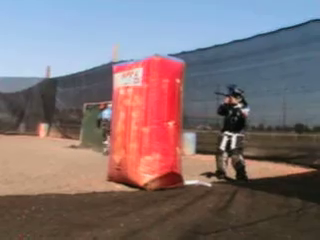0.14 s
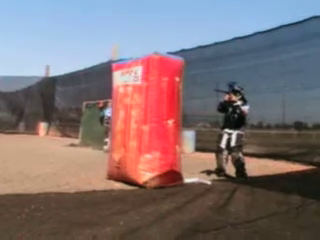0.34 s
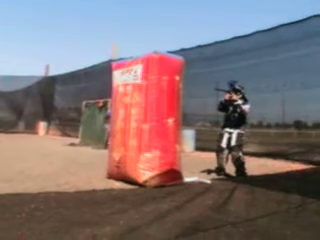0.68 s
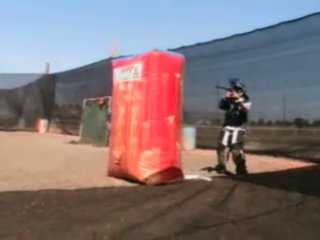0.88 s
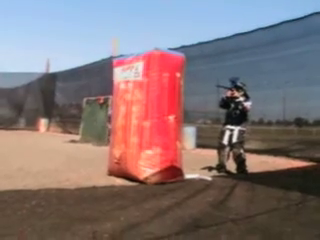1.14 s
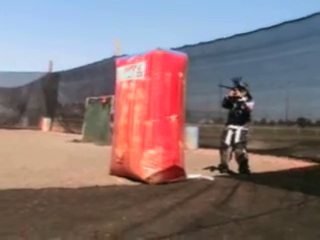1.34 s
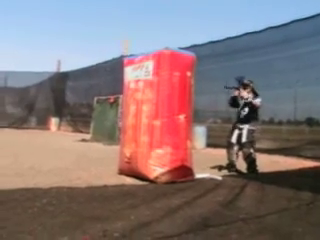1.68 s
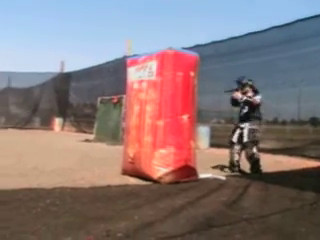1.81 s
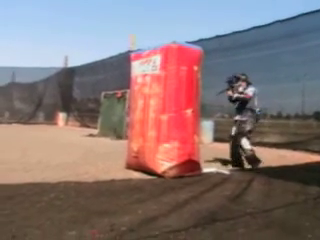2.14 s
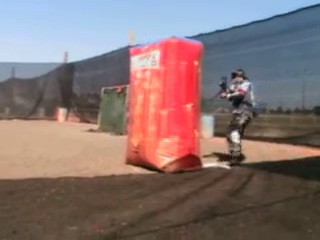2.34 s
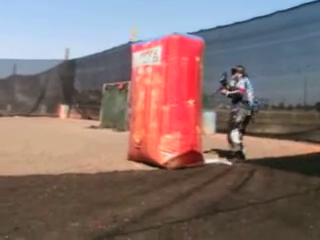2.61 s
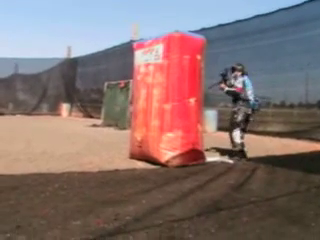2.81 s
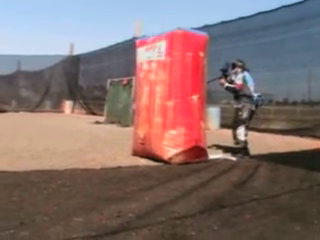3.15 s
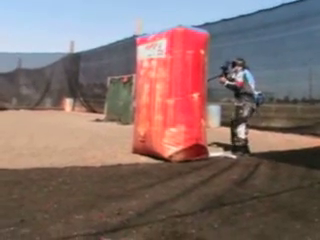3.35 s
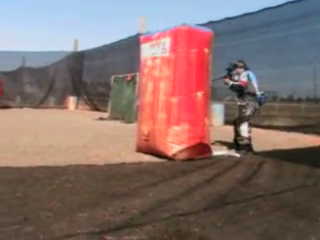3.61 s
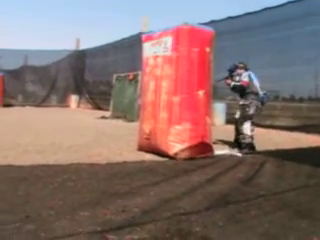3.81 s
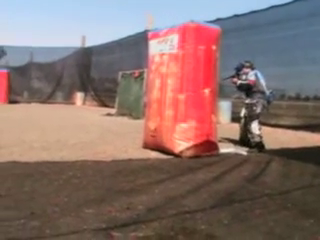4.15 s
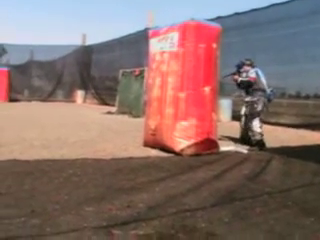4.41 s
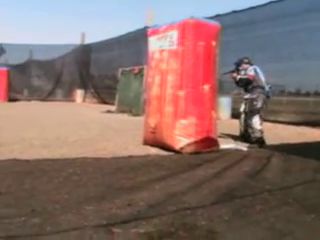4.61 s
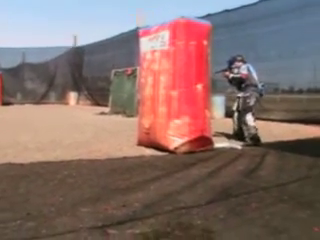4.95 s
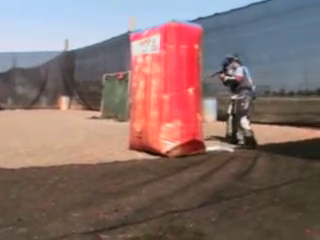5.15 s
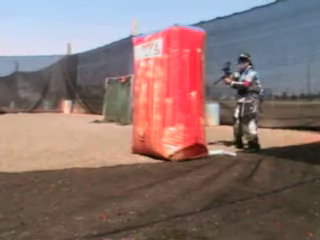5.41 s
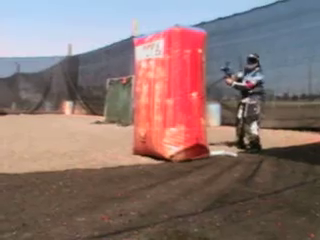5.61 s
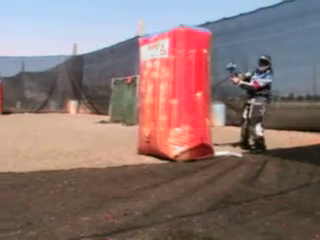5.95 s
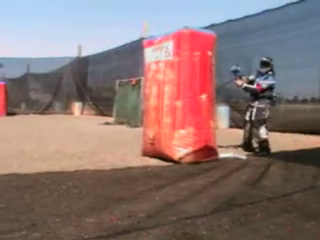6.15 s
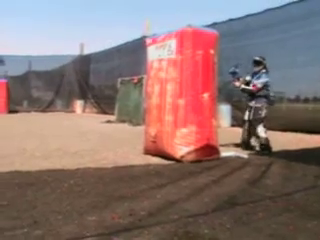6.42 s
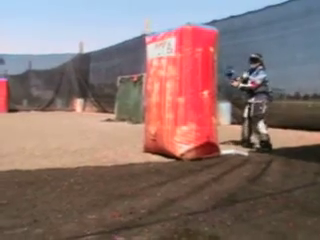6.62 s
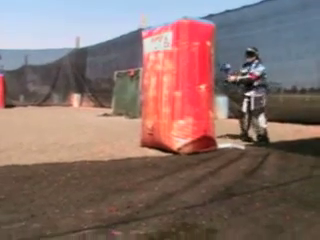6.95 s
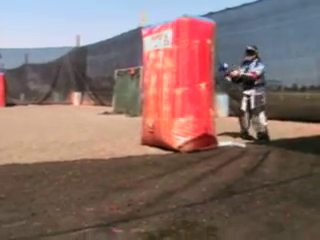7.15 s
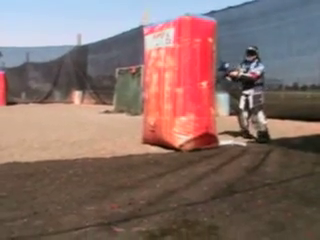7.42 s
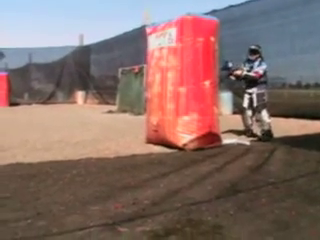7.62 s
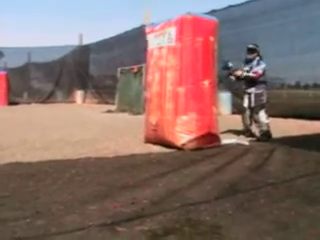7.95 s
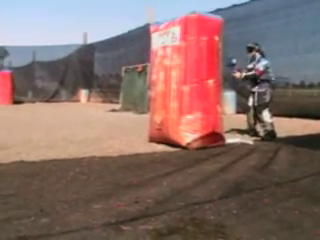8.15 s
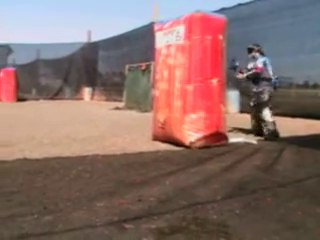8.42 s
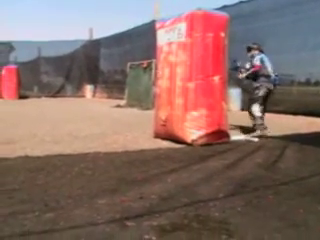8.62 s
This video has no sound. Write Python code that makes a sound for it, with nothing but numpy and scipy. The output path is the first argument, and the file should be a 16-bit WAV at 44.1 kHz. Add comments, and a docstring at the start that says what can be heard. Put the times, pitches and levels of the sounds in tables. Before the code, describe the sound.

A near paintball marker snaps off a quick string of shots, then dull hollow thumps rattle on unevenly, swelling to heavy overloaded blows outdoors.

```python
"""An open paintball field, heard beside a tall inflatable bunker. A near marker snaps off a short string of shots,
each a gas pulse through barrel resonances. Dull, hollow thumps run throughout: balls hitting the bunker nearby,
or markers firing farther off with echoes from the field. Each is a few damped modes, then a hollow ring, a short
flutter and a wash of echoes. A few light knocks come later. Behind lie filtered-noise rumble, din and hiss, with
pops of far markers. A small dull microphone overloads on the loudest blows."""
import sys
import numpy as np
from scipy import signal
from scipy.fft import rfft, irfft, next_fast_len
from scipy.io import wavfile

SR = 44100
rng = np.random.default_rng(int(sys.argv[2]) if len(sys.argv) > 2 else 0)


def output_pcm(signal):
    """Save a mono or channel-first signal as 16-bit PCM at the path in sys.argv[1].

    Samples are clipped to [-1, 1] before scaling.
    """
    pcm = np.clip(np.atleast_2d(signal).T, -1, 1) * 32767
    wavfile.write(sys.argv[1], SR, np.round(pcm).astype(np.int16))


N = 386757  # length in samples
AGE = np.arange(SR // 2) / SR  # seconds since the start of an event, up to half a second

# Game going on around the listener, gliding from row to row. Each row: start in seconds,
# then rumble, din and hiss in dB, each before the trim of its layer.
GAME_LEVELS = [(0.0, -35, -51.5, -43), (0.98, -33.5, -28.5, -44.5), (1.54, -37.5, -42, -47),
               (2.83, -40.5, -37.5, -44), (4.4, -34, -32.5, -44.5), (4.76, -41.5, -44.5, -47),
               (5.33, -36, -32, -41.5), (5.64, -40, -44, -45.5), (6.18, -28, -51, -43.5),
               (6.32, -30, -40, -34.5), (6.67, -30.5, -38.5, -37.5), (6.91, -27.5, -27, -33.5),
               (7.69, -34, -43, -41.5), (7.89, -34, -30, -39.5), (8.18, -37.5, -44, -40),
               (8.77, -26.5, -26, -38.5)]
# Tone of the open field. Each row: frequency in Hz, relative noise density in dB.
FIELD_SPECTRUM = [(30, -12), (70, 2), (200, 2.5), (330, 1.5), (500, -5.5), (1000, -12.5), (1600, -5),
                  (2600, -11.5), (4500, -24.5), (7000, -45)]
# Shots of the near marker. Each row: muzzle time in seconds, crack level in dB.
MARKER_SHOTS = [(0.0412, -11.5), (0.3972, -13.5), (0.5692, -13.5), (0.7188, -15.5), (0.868, -17.5),
                (1.0092, -13), (1.155, -15), (1.3178, -20.5), (1.4705, -16.5), (1.6605, -20.5)]
# Barrel and port resonances of the near marker. Each row: lowest frequency in Hz, width in Hz, gain in dB.
BARREL_RESONANCES = [(270, 200, 26), (590, 300, 24.5), (810, 51, 25.5), (1110, 310, 22), (1590, 100, 24),
                     (2600, 350, 4), (3240, 120, 21), (4140, 120, -40), (5200, 500, -39)]
# Tone of the echo wash. Each row: frequency in Hz, relative noise density in dB.
WASH_SPECTRUM = [(30, -19.5), (80, 6.5), (220, 12.5), (420, 3.5), (750, 9), (1250, 10.5), (1800, 3.5),
                 (2600, -10), (4200, -18.5), (7000, -42)]
# Dull, hollow thumps: balls hitting the bunker nearby, or markers firing farther off with echoes from the field.
# Each row: time in seconds, strength in dB (the level of the slap), slap pitch in Hz,
# tick level in dB over the strength, echo level in dB.
HOLLOW_THUMPS = [(0.0533, -15, 640, -24, -32.5), (.242, -9, 1044, -13.5, -22.5),
                 (0.327, -15, 623, -8.5, -31.5), (0.3875, -19.5, 756, -9, -44),
                 (0.4755, -20.5, 695, -13, -41), (0.5456, -17.5, 740, -14, -52), (0.67, -12, 980, -22, -37),
                 (0.7503, -13.5, 990, -20, -35), (0.8703, -11, 804, -10, -36), (0.9517, -22, 919, -5, -28),
                 (1.1047, -22, 1100, 0, -35.5), (1.168, -25, 970, -20, -45), (1.2718, -18, 676, -2.5, -32),
                 (1.3393, -21.5, 650, -5, -49), (1.378, -18.5, 750, -3, -35.5),
                 (1.4985, -19, 700, -1.5, -36), (1.5278, -15, 950, -17, -43), (1.615, -36, 1170, -14, -50),
                 (1.7547, -20, 980, -3.5, -32), (1.8127, -15.5, 1230, -26, -44),
                 (1.8528, -15.5, 766, -10.5, -33), (1.9403, -20, 1040, -8, -32),
                 (2.0366, -19, 710, 0, -29.5), (2.0567, -17.5, 730, -3, -51),
                 (2.178, -20, 1160, -14, -29.5), (2.324, -14.5, 1076, -25, -34.5),
                 (2.382, -15, 980, -27, -34.5), (2.4882, -18, 1100, -19, -32.5),
                 (2.5655, -23, 1420, -2, -30), (2.6403, -15, 1036, -30, -39.5),
                 (2.7007, -22, 1080, -9, -30.5), (2.8145, -18, 870, 0, -28), (2.8385, -19, 785, -5, -31.5),
                 (2.9171, -18.5, 1080, -6, -33.5), (3.107, -19.5, 990, -9.5, -28.5),
                 (3.171, -15.5, 1100, -11.5, -28.5), (3.2599, -13, 847, -13.5, -32.5),
                 (3.3426, -17, 940, -3, -32), (3.4241, -17.5, 990, -11, -32),
                 (3.4894, -20, 860, -17.5, -29.5), (3.5831, -15, 1070, -8, -32.5),
                 (3.6839, -23, 759, -7.5, -28), (3.771, -22, 675, -12, -28.5),
                 (3.8316, -17.5, 1080, -8.5, -28), (3.8923, -18, 1150, -7, -32.5),
                 (3.989, -13.5, 1040, -25, -29.5), (4.0233, -15, 1170, -14, -33),
                 (4.153, -14.5, 984, -31, -31.5), (4.2368, -18, 800, -2, -30),
                 (4.307, -18.5, 840, -4, -32.5), (4.395, -18, 750, -1.5, -29.5),
                 (4.4576, -18, 694, -4, -32), (4.5502, -14, 950, -19, -35),
                 (4.7075, -24.5, 1010, -16, -48.5), (4.8773, -9, 950, -32, -28.5),
                 (5.0554, -20.5, 746, -7.5, -26), (5.1174, -8.5, 787, -14.5, -36),
                 (5.224, -14, 1135, -8, -27.5), (5.2711, -19, 810, -15, -29.5), (5.3561, -16, 660, -5, -32),
                 (5.4381, -29, 874, -12.5, -39), (5.4863, -15.5, 860, -18, -31.5),
                 (5.7572, -30, 650, -15, -56), (5.842, -23, 740, -14, -28.5),
                 (5.928, -27, 690, -5.5, -44.5), (6.111, -29.5, 680, -7.5, -56),
                 (6.1714, -13.5, 804, -1, -25), (6.244, -29, 703, -3, -31), (6.332, -4, 735, -6.5, -23),
                 (6.685, -3, 765, -14.5, -19), (6.7711, -6.5, 764, -5.5, -23),
                 (6.8305, -11, 1096, -9.5, -22.5), (6.9579, -3.5, 880, -25, -23.5),
                 (7.021, -7, 815, -20, -25), (7.0987, -15.5, 890, -3.5, -33), (7.1792, -15.5, 870, 3, -26),
                 (7.2542, -14.5, 935, -8.5, -31), (7.3389, -10, 640, -15.5, -45),
                 (7.365, -13, 955, -6.5, -23.5), (7.401, -16.5, 814, -8, -33), (7.4511, -13, 790, -13, -41),
                 (7.499, -22.5, 690, 4, -51), (7.6648, -19, 800, 0, -29), (7.7486, -9, 1040, -6, -26.5),
                 (7.834, -17, 1216, -11, -33), (7.8647, -22, 1060, -0.5, -33), (7.9112, -25, 840, -2, -34),
                 (7.966, -14, 726, -6, -32.5), (7.996, -30, 900, 8.5, -30.5),
                 (8.0464, -11.5, 970, -14, -37), (8.0825, -27, 890, 4, -35),
                 (8.1671, -16, 1080, -12.5, -32), (8.226, -17.5, 880, -11.5, -32.5),
                 (8.235, -25.5, 930, 1, -39), (8.3231, -27, 910, -6, -35), (8.3509, -29, 1020, 4, -39),
                 (8.4048, -21.5, 950, -11, -31), (8.4405, -21.5, 1040, -8, -35),
                 (8.478, -13.5, 950, -18, -28), (8.5254, -20.5, 880, -3, -43),
                 (8.585, -19.5, 630, -2.5, -32.5), (8.6556, -23, 1020, 1, -32.5),
                 (8.697, -25, 840, -17, -48), (8.7431, -18.5, 900, -9, -36)]
# Hollow resonances that ring after a blow, varied a little from blow to blow.
# Each row: centre frequency in Hz, typical relative level in dB, time to fall 60 dB in seconds.
HOLLOW_MODES = [(182.2, 0, 0.098), (205, -9, 0.18), (251.7, 5, 0.066), (337.5, -0.5, 0.16),
                (465.5, -4.5, 0.14), (554.6, 2.5, 0.13), (677, -7.5, 0.26), (750, -4.5, 0.17),
                (806, -14, 0.27), (1022, -11.5, 0.31), (1113, -11, 0.21), (1202, -9, 0.057),
                (1240, -18.5, 0.17)]
# Tone of the short flutter after a blow. Each row: frequency in Hz, relative noise density in dB.
FLUTTER_SPECTRUM = [(30, -29), (80, -2), (210, 13), (300, -16.5), (410, -1), (600, 9), (850, -13),
                    (1300, -3), (2500, -38.5), (7000, -62.5)]
# Light knocks with a dry click, probably spent balls dropping on the mat nearby.
# Each row: time in seconds, knock level in dB.
MAT_DROPS = [(6.451, -25), (6.5497, -22), (6.606, -30), (6.6675, -21), (7.108, -24), (7.316, -21),
             (7.5182, -32), (7.584, -30.5), (7.6263, -27.5)]

# A typical blow, from which the others are reckoned.
USUAL_DB, USUAL_SLAP_HZ, USUAL_TICK_DB, USUAL_ECHO_DB = -17, 900, -12, -31
THUMP_DB, THUMP_HZ, TICK_HZ, RING_DB = -18, 265.8, 1990, -24.5
# A stronger blow thumps higher; one with a louder tick thumps less and ticks lower.
THUMP_HZ_PER_DB = 4  # per dB of strength
THUMP_LOSS, TICK_DROP_HZ = 0.089, 42  # dB and Hz, per dB of tick
# A lower slap comes with a weaker thump.
THUMP_DB_PER_OCTAVE = 3  # per octave of slap pitch
# The ring grows with the blow and with its echoes (dB per dB).
RING_PER_STRENGTH, RING_PER_ECHO = 0.37, 0.4
# No two blows sound alike (standard deviation, as a share of the pitch).
THUMP_SCATTER, TICK_SCATTER = 0.098, 0.21

MIC_HZ, TOP_HZ = 5550, 7305  # treble limits of the microphone and of the final sound
OVERLOAD, FULL_SCALE = .7, .77  # amplitudes where the microphone flattens and the input clips


def undb(db):
    """Decibels to gain."""
    return 10 ** (np.asarray(db) / 20)


def level(x, db, start=0., end=.01):
    """Scale a sound to an rms level, taken over a stretch of its life in seconds."""
    stretch = x[int(start * SR):int(end * SR)]
    return x * undb(db) / np.sqrt(np.mean(stretch ** 2))


def add(out, s, x):
    """Mix a sound in at a time in seconds, cutting it off at the end of the scene."""
    i = max(int(round(s * SR)), 0)
    out[i:i + len(x)] += x[:max(len(out) - i, 0)]


def fade(t60):
    """Exponential decay that falls 60 dB in t60 seconds."""
    return np.exp(-np.log(1000) * AGE / t60)


def swell(seconds):
    """A soft onset."""
    return 1 - np.exp(-(AGE / seconds) ** 2)


def mode(hz, t60, phase=0.):
    """A damped vibration: a sine that dies away exponentially."""
    return np.sin(2 * np.pi * hz * AGE + phase) * fade(t60)


def band(x, hz, width):
    """Two-pole resonance with gain 1 at the centre."""
    b, a = signal.iirpeak(hz, hz / width, fs=SR)
    return signal.lfilter(b, a, x)


def cut(x, hz, kind="low", order=3):
    """Low-pass or high-pass."""
    sections = signal.butter(order, hz, kind, fs=SR, output="sos")
    return signal.sosfilt(sections, x)


def noise(spectrum, size):
    """Noise of unit rms, coloured by a spectrum of (Hz, dB) points."""
    hz, db = np.transpose(spectrum)
    n = next_fast_len(size)
    f = np.maximum(np.fft.rfftfreq(n, 1 / SR), 1)
    gain = undb(np.interp(np.log(f), np.log(hz), db))
    x = irfft(rfft(rng.standard_normal(n)) * gain, n)[:size]
    return x / x.std()


def curve(table):
    """Gain per sample for each dB column of a table, gliding between its times."""
    s, *columns = np.transpose(table)
    t = np.arange(N) / SR
    return [undb(np.interp(t, s, column)) for column in columns]


def far_markers(count=3, pop_db=1, scatter_db=4):
    """Distant players each keep up their own uneven string of dull pops, noise bursts at one pitch."""
    out = np.zeros(N)
    for _ in range(count):
        hz = rng.uniform(500, 1900)
        for s in np.cumsum(rng.uniform(0.075, 0.73, size=60)):
            if s < N / SR:
                burst = rng.standard_normal(len(AGE)) * (fade(0.024) + 0.073 * fade(0.05))
                pop_level = pop_db + scatter_db * rng.uniform(-4.0, 1)
                add(out, s, level(band(burst, hz, 600), pop_level))
    return cut(out, 2500, order=2)


def field(low_db=-4, middle_db=-8, high_db=-2):
    """Far pops over a rumble, a distant din and a hiss that swell with the game."""
    low, middle, high = curve(GAME_LEVELS)
    rumble = cut(noise(FIELD_SPECTRUM, N), 650)
    din = cut(cut(noise(FIELD_SPECTRUM, N), 550, "high"), 2000)
    hiss = cut(noise(FIELD_SPECTRUM, N), 1600, "high")
    rumble_layer = undb(low_db) * low * rumble / rumble.std()
    hiss_layer = undb(high_db) * high * hiss / hiss.std()
    # the far pops rise and fall with the din
    middle_layer = undb(middle_db) * middle * (din / din.std() + far_markers())
    return rumble_layer + middle_layer + hiss_layer


def marker(dwell_s=0.0059, echo_db=-23):
    """The solenoid ticks, the valve dumps a gas pulse down the barrel, and the bolt clacks home."""
    out = np.zeros(N)
    bolt_s = .019  # from solenoid to muzzle, and again from muzzle to bolt
    solenoid_db, bolt_db = -31, -20  # relative to the crack
    for s, db in MARKER_SHOTS:
        gas = rng.standard_normal(len(AGE)) * np.exp(-(AGE / dwell_s) ** 2)
        gas[0] -= 9  # the ball uncorks the muzzle
        crack = sum(undb(gain_db) * band(gas, hz * rng.uniform(1.0, 1.04), width)
                    for hz, width, gain_db in BARREL_RESONANCES)
        echo = undb(db + echo_db) * noise(WASH_SPECTRUM, len(AGE)) * fade(0.19)
        burst = rng.standard_normal(len(AGE)) * fade(0.02)
        click = band(band(burst, 3900, 2100), 2900, 2600)
        add(out, s - bolt_s, level(click, db + solenoid_db))
        add(out, s, level(crack, db) + echo)
        add(out, s + bolt_s, level(click, db + bolt_db))
    return out


def strike(thump_db, thump_hz, slap_db, slap_hz, tick_db, tick_hz, overtone_db=-9, spatter_db=-11, bounce_db=-15):
    """A blow built of a high tick, a slap in the middle and a low thump, all quickly damped."""
    push = mode(thump_hz, 0.024, np.pi / 2) + .5 * mode(113.4, 0.037, np.pi / 2)
    thump = push * swell(0.00047)
    # the overtone sits where a stretched membrane has its second mode, about 1.6 times higher
    tone = mode(slap_hz, 0.0057) + undb(overtone_db) * mode(1.66 * slap_hz, 0.0048)
    slap = tone * (1 - np.exp(-AGE / 0.0045))
    # one clean snap, and a longer noisy spatter at a pitch of its own
    burst = rng.standard_normal(len(AGE)) * fade(0.014)
    spatter = band(burst, rng.uniform(3100, 3400), 580)
    tick = mode(tick_hz, 0.005) + undb(spatter_db) * spatter
    blow = level(thump, thump_db) + level(slap, slap_db) + level(tick, tick_db)
    # the ground returns it a few milliseconds later
    lag = int(SR * rng.uniform(0.0033, 0.0099))
    bounce = np.pad(blow, (lag, 0))[:len(AGE)]
    return blow + undb(bounce_db) * bounce


def ring(ring_db, echo_db, flutter_t60=0.071, wash_t60=0.57, early_t60=0.07, modes_db=-2, flutter_db=-4):
    """After a blow hollow modes ring, a noisy flutter dies quickly, and echoes wash out."""
    # each blow favours other modes
    chance = rng.standard_normal((len(HOLLOW_MODES), 2))
    hollow = np.zeros(len(AGE))
    for (hz, db, t60), (level_chance, pitch_chance) in zip(HOLLOW_MODES, chance):
        phase = rng.uniform(0, 2 * np.pi)
        hollow += undb(db + 1.3 * level_chance) * mode(hz * (1 + 0.005 * pitch_chance), t60, phase)
    flutter = noise(FLUTTER_SPECTRUM, len(AGE)) * fade(flutter_t60)
    # answers of near obstacles die first, the far netting lingers
    wash = noise(WASH_SPECTRUM, len(AGE)) * (fade(wash_t60) + fade(early_t60))
    # the blow arrives clean; ring, flutter and echoes need some milliseconds to build
    parts = ((hollow * swell(.003), ring_db + modes_db),
             (flutter * swell(.007), ring_db + flutter_db),
             (wash * swell(.009), echo_db))
    return sum(level(x, db, .012, .05) for x, db in parts)


def hollow_thumps():
    """Balls hitting the bunker nearby, or markers firing farther off: a blow, then a hollow ring and echoes."""
    out = np.zeros(N)
    chance = rng.standard_normal((len(HOLLOW_THUMPS), 2))
    for (s, db, slap_hz, tick_db, echo_db), (thump_chance, tick_chance) in zip(HOLLOW_THUMPS, chance):
        force = db - USUAL_DB
        sharpness = tick_db - USUAL_TICK_DB
        pitch_gain_db = THUMP_DB_PER_OCTAVE * np.log2(slap_hz / USUAL_SLAP_HZ)
        thump_db = THUMP_DB + force - THUMP_LOSS * sharpness + pitch_gain_db
        thump_hz = (THUMP_HZ + THUMP_HZ_PER_DB * force) * (1 + THUMP_SCATTER * thump_chance)
        tick_hz = (TICK_HZ - TICK_DROP_HZ * sharpness) * (1 + TICK_SCATTER * tick_chance)
        ring_db = RING_DB + RING_PER_STRENGTH * force + RING_PER_ECHO * (echo_db - USUAL_ECHO_DB)
        blow = strike(thump_db, thump_hz, db, slap_hz, db + tick_db, tick_hz)
        add(out, s, blow + ring(ring_db, echo_db))
    return out


def drops(knock_hz=325, slap_db=-14, click_db=-3, click_hz=2000, ring_db=-17, echo_db=-22):
    """Probably spent balls landing: each a knock and a click, with hardly any slap or ring."""
    out = np.zeros(N)
    for s, db in MAT_DROPS:
        knock = strike(db, knock_hz, db + slap_db, USUAL_SLAP_HZ, db + click_db, click_hz)
        add(out, s, knock + ring(db + ring_db, db + echo_db))
    return out


def scene():
    """The field, the near marker, the hollow thumps and the light knocks, in mono."""
    return (field() + marker() + hollow_thumps() + drops())[None]


def record(dry):
    """A dull microphone without deep bass flattens the loudest blows, and the input clips what overshoots."""
    x = cut(dry, 68, "high", order=2)
    x = x / (1 + (x / OVERLOAD) ** 12) ** (1 / 12)  # nearly straight up to the overload, then flat
    x = cut(x, MIC_HZ, order=11)
    x = np.clip(x, -FULL_SCALE, FULL_SCALE)
    return cut(x, TOP_HZ, order=14)


dry = scene()
out = record(dry)
output_pcm(out)
```